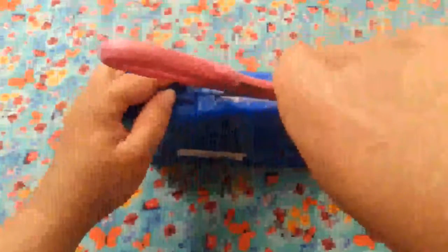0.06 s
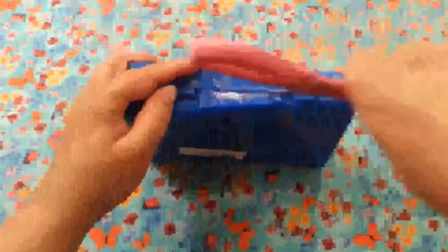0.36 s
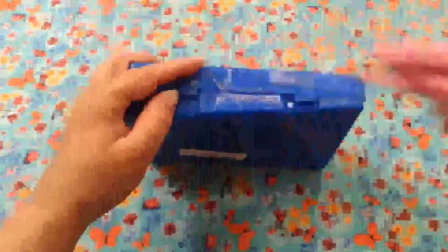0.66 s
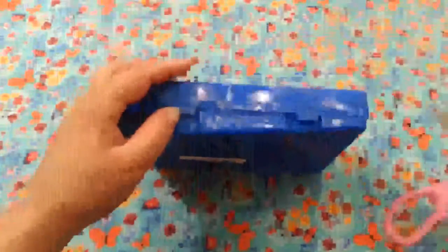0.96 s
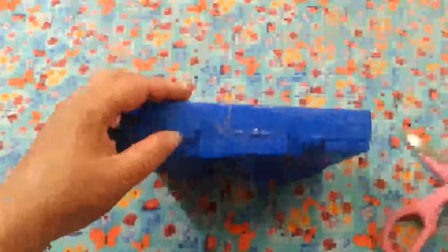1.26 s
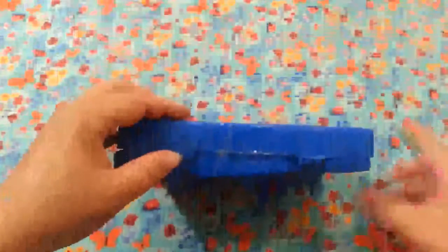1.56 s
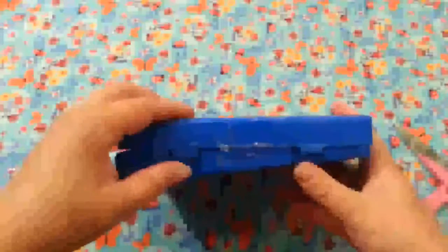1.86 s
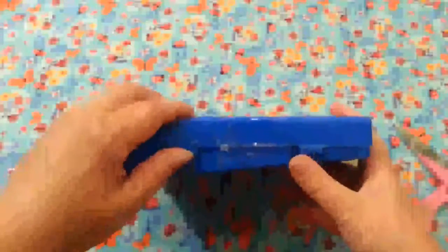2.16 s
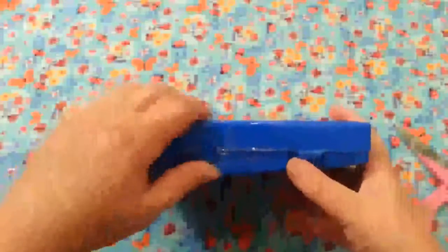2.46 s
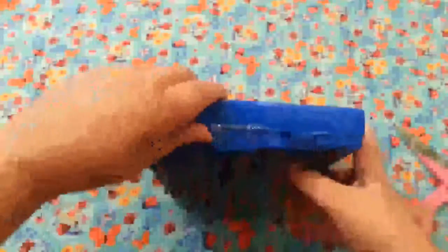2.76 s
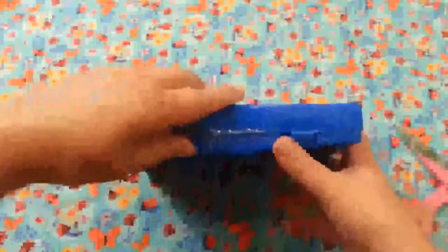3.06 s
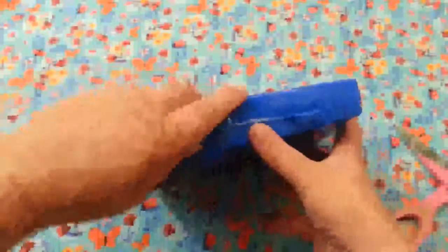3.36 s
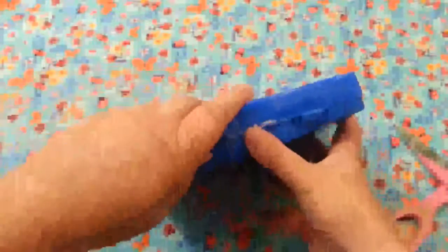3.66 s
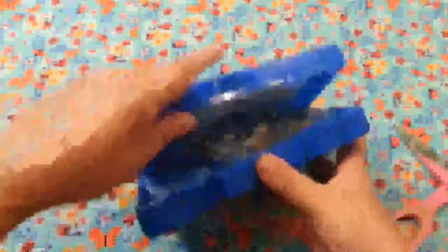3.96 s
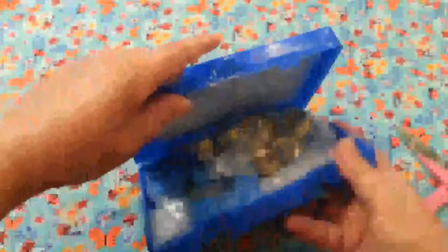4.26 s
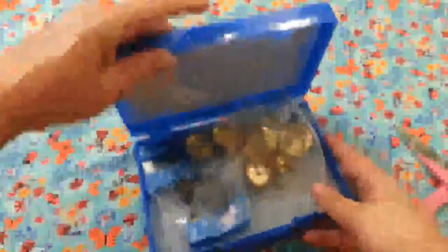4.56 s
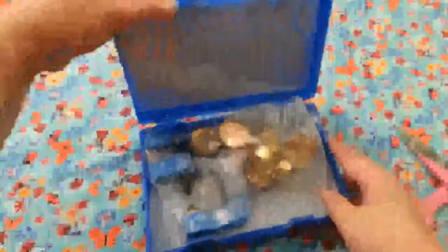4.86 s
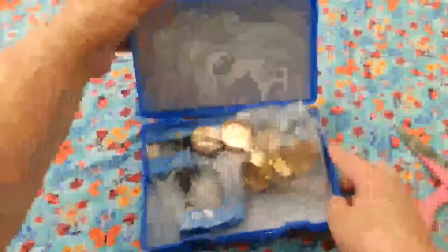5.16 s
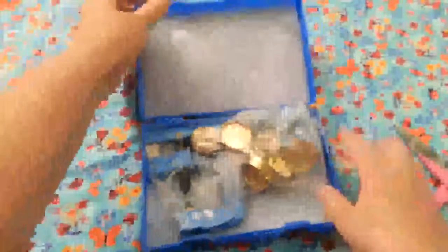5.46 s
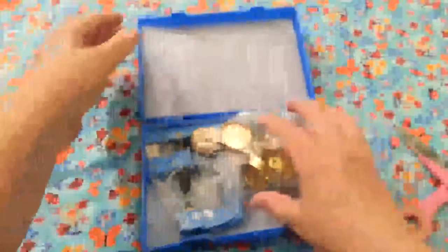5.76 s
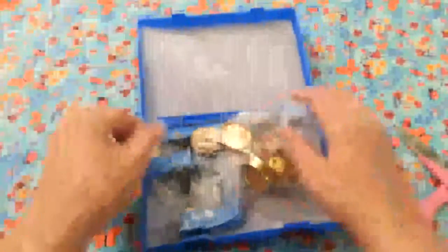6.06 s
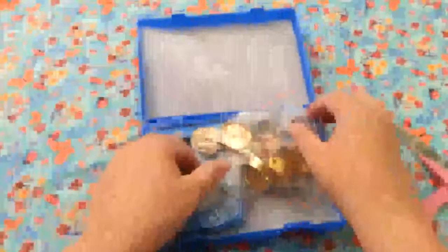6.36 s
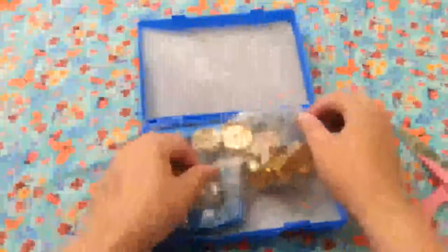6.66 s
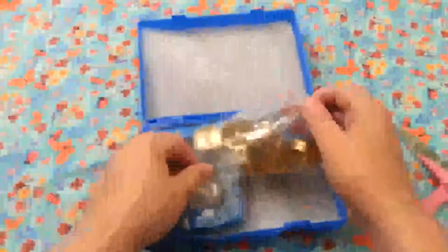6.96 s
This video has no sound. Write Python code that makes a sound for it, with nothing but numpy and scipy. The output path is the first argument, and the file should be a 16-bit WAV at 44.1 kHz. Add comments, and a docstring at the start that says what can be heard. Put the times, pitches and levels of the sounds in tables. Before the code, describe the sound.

Close up in a small, quiet room, a blade rasps on a plastic case and slips off with a knock, and the scissors rattle down on the table. Fingers shift over the case, which ticks, creaks and knocks as it is pried. The latches snap open loudly enough to overload the microphone, with tiny metal clinks. Soft rubbing follows, then a plastic bag crinkles as it is lifted.

```python
"""Scissors scrape through the seal of a plastic case, catching and slipping, then clatter onto the table.
Hands rub, turn and pry the hollow case, which knocks and creaks until its latches snap open,
loud enough to overload the microphone. The lid swings back, and fingers lift a crinkling plastic
bag in which metal parts clink. It all happens close to a camera in a small, softly hissing room."""
import sys
import numpy as np
from scipy import signal
from scipy.fft import rfft, irfft
from scipy.io import wavfile
from scipy.ndimage import uniform_filter1d

SR = 44100
rng = np.random.default_rng(int(sys.argv[2]) if len(sys.argv) > 2 else 0)


def waveform_to_disk(signal):
    """Save audio, clipped to [-1, 1], as 16-bit WAV at the path in sys.argv[1]."""
    frames = np.transpose(np.atleast_2d(signal))
    scaled = np.clip(frames, -1, 1) * 32767
    samples = np.round(scaled).astype(np.int16)
    wavfile.write(sys.argv[1], SR, samples)


N = 318402


def amp(db):
    """Turns decibels into a gain to multiply by."""
    return 10 ** (np.asarray(db) / 20)


def unit(x):
    """Scales a signal to an average (rms) level of 1."""
    return x / np.sqrt(np.mean(x ** 2) + 1e-20)


def read(points, hz):
    """Reads between the rows of a (Hz, value) table, with frequency on a log scale."""
    table_hz, value = np.transpose(points)
    return np.interp(np.log(hz + 1), np.log(table_hz + 1), value)


def add(mix, start_s, sound):
    """Mixes a sound in at the given time."""
    part = mix[:, max(0, round(start_s * SR)):][:, :sound.shape[-1]]
    part += sound[..., :part.shape[1]]


def band(x, hz, kind, order=4):
    """Keeps the lows, the highs or a band between."""
    return signal.sosfilt(signal.butter(order, hz, kind, fs=SR, output="sos"), x)


def colour(x, points, size=2048):
    """Shapes the tone to a (Hz, dB) curve without smearing any sound earlier in time."""
    hz = abs(np.fft.fftfreq(size, 1 / SR))
    log_gain = np.log(amp(np.maximum(read(points, hz), -100)))
    taps = np.fft.ifft(np.exp(signal.hilbert(log_gain).conj())).real[:size // 2]
    return signal.oaconvolve(x, taps[None], axes=1)[:, :x.shape[1]]


def resonances(x, modes):
    """The ringing a sound stirs up. Each mode: pitch in Hz, width in Hz, level in dB."""
    return sum(amp(db) * signal.lfilter(*signal.iirpeak(hz, hz / width, SR), x)
               for hz, width, db in modes)


def pair(x):
    """Blends two unrelated signals into left and right, more alike in the lows than the highs."""
    # Each row: frequency in Hz, how alike the two sides are (1 is identical).
    likeness = [(100, 0.5), (450, 0.52), (1500, 0.58), (4000, -0.06), (10000, 0)]
    # Each row: frequency in Hz, left minus right in dB.
    balance = [(100, 1), (400, -0.8), (1200, -2), (2500, -2), (5000, 0.5), (11000, 2.5)]
    hz, (a, b) = np.fft.rfftfreq(x.shape[1], 1 / SR), rfft(x)
    same = np.clip(read(likeness, hz), 0, 1)
    mid, side = a * np.sqrt((1 + same) / 2), b * np.sqrt((1 - same) / 2)
    lean = amp(read(balance, hz) / 2)
    return irfft([(mid + side) * lean, (mid - side) / lean], x.shape[1])


def wander(rate_hz, shape=N):
    """A smooth random wobble; a higher rate moves faster."""
    return unit(band(rng.standard_normal(shape), rate_hz, "lowpass", order=2))


def fits(rate_hz, depth_db):
    """A gain that comes and goes at random."""
    return amp(depth_db * np.clip(wander(rate_hz), -2, 1.5))


def held(start, end, attack_s, release_s):
    """A gain that rises, holds until the end, then dies away."""
    t = np.arange(N) / SR
    return np.clip((t - start) / attack_s, 0, 1) * np.exp(-np.maximum(t - end, 0) / release_s)


def moves(rows):
    """Each hand move speeds up and slows down. Returns gains for its main sound and its hiss."""
    body, hiss, t = 0, 0, np.arange(N) / SR
    for middle, half, body_db, hiss_db in rows:
        speed = np.exp(-((t - middle) / half) ** 2)
        body += amp(body_db) * speed
        hiss += amp(hiss_db) * speed
    return body, hiss


def burst(decay_s, size=8192, span=90):
    """Countless high rings die together as a puff of noise. A smaller span gives a more even tone."""
    fade = np.exp(-np.arange(size) / SR / max(decay_s, 1e-4))
    spectrum = rfft(rng.standard_normal((2, size)) * fade)
    spectrum /= np.sqrt(uniform_filter1d(abs(spectrum) ** 2, span, axis=1))
    return pair(irfft(spectrum) * np.hanning(2 * size)[size:])


def grains(per_s, spread_db, wash, clump_db):
    """Tiny slips of very unequal size, in clumps, over a wash of still smaller ones."""
    sizes = amp(spread_db * np.minimum(rng.exponential(1, N), 4))
    sizes *= rng.random(N) < per_s / SR
    clumps = amp(clump_db * wander(45))
    slips = unit(sizes * rng.choice([-1, 1], (2, N)))
    return clumps * pair(slips + wash * rng.standard_normal((2, N)))


def struck_spot(x, uneven_db):
    """Every spot on an object favours its own random set of high pitches."""
    modes_hz = np.arange(1000, 14000, 290)
    modes_db = uneven_db * np.clip(rng.standard_normal(len(modes_hz)), -2, 1)
    return colour(x, [(800, 0.0038), *zip(modes_hz, modes_db)])


def crack(db, decay_s, high_db, top_db, low_db, bass_db, uneven_db, span=90):
    """The noise of two things meeting, with four tone controls from bass to top."""
    tone = [(40, -25.5), (220, bass_db), (750, low_db), (1600, -3.5), (4000, high_db),
            (9500, top_db), (14000, top_db - 5)]
    return struck_spot(amp(db) * colour(burst(decay_s, span=span), tone), uneven_db)


def panel(hz, db, damping, swell_cycles=1.491, size=8192):
    """A struck panel swings widest after swell_cycles, then dies within a few more."""
    t, swell_s = np.arange(size) / SR, swell_cycles / hz
    envelope = (t / swell_s * np.exp(1 - t / swell_s)) ** damping
    return amp(db) * envelope * np.sin(2 * np.pi * hz * (t - swell_s))


def scrape(slips_per_s=140, jitter=0.5, spread_db=4):
    """The blade catches and slips unevenly over finer grit; each edge of the seal rasps in fits."""
    # Each row is one drag of the blade: start in seconds, end in seconds, level in dB.
    drags = [(0, 0.011, -30), (0.165, 0.234, -52.5), (0.302, 0.521, -25.5)]
    # Each row is a ring of the seal's edges: pitch in Hz, width in Hz, level in dB.
    edge_modes = [(1080, 260, -5), (1665, 250, -1), (2250, 320, -9.5), (4030, 460, -15.5)]
    # Each row: frequency in Hz, level in dB.
    scrape_tone = [(59, -55), (100, -15), (232, -9.5), (268, -12), (421, 2), (700, -12), (1660, -12),
                   (2360, -12.5), (2840, -12), (4700, -15), (6060, -23), (6720, -21), (8420, -20.5),
                   (11200, -22.5), (13500, -33)]
    rate = slips_per_s * np.exp(jitter * wander(70))
    slips = np.diff(np.floor(np.cumsum(rate) / SR), prepend=0)  # one spike for each slip
    slips *= amp(spread_db * np.clip(rng.standard_normal(N), -2, 1))
    chatter = signal.oaconvolve(slips[None], burst(0.0032, span=40), axes=1)[:, :N]
    grit = struck_spot(unit(chatter) + 0.6 * grains(1500, 2.4, 0.5, clump_db=1.5), uneven_db=2)
    rasp = sum(resonances(grit * fits(35, depth_db=4), [edge]) for edge in edge_modes)
    pressure = fits(25, depth_db=1.2)
    drag = sum(amp(db) * held(start, end, attack_s=0.0009, release_s=0.0052) for start, end, db in drags)
    return drag * unit(pressure * colour(grit + rasp, scrape_tone))


def knocks():
    """Blade, catch and lid hit the hollow case. Returns the panel's swings and the ringing cracks."""
    # Each row: start in seconds, panel pitch in Hz, panel level in dB, crack level in dB,
    # crack decay in seconds, the crack's lows in dB, its top in dB.
    blows = [(0.294, 390, -22, -2, 0.002, 3.5, -8.5), (0.3066, 410, -11, 22.5, 0.0016, -13, -19.5),
             (0.3097, 446, -16, 19, 0.0018, -10, -12.5), (0.5213, 428, -12, 9, 0.0045, -24, -21.5),
             (0.5254, 390, -3, 22.5, 0.0033, -6, -31.5), (2.835, 374, -7, 14.5, 0.0031, 2.5, -16.5),
             (3.969, 452, -31.5, -6.5, 0.0026, -4.5, -23), (3.974, 445, -28, 9, 0.006, -1, -24),
             (4.7065, 368, -22, -2.5, 0.017, 4, -24), (4.8068, 317, -30, 3, 0.0054, -13, -16.5)]
    # Each row is a ring of the hollow case: pitch in Hz, width in Hz, level in dB.
    shell_modes = [(1046, 220, -4), (1360, 110, -6), (1678, 200, 0), (2384, 790, -6.5), (2780, 45, -6),
                   (4040, 230, -7)]
    swings, cracks = np.zeros((2, 2, N))
    for start, hz, panel_db, crack_db, decay_s, low_db, top_db in blows:
        add(swings, start, panel(hz, panel_db, damping=4.6))
        add(cracks, start, crack(crack_db, decay_s, high_db=-14.5, top_db=top_db, low_db=low_db,
                                 bass_db=-9.5, uneven_db=3.5))
    return swings, cracks + resonances(cracks, shell_modes)


def table_boom(start=0.525, hz=120, db=-39, fade_s=1.19):
    """The blade slips off the case and the table hums on, falling 60 dB in fade_s."""
    out, t = np.zeros((2, N)), np.arange(SR) / SR
    add(out, start, amp(db - 60 * t / fade_s) * np.sin(2 * np.pi * hz * t))
    return out


def ticks(decay_s=0.0026):
    """Plastic edges catch on each other and click without moving a panel."""
    # Each row: start in seconds, level in dB, the click's top in dB.
    clicks = [(0.6829, 13, -17.5), (0.6841, 15, -32), (2.505, 3, -10.5), (2.63, 1, -25), (3.4401, -1, -36),
              (4.0171, 8, -23), (4.918, -7, -37), (4.9774, -6, -8), (5.001, -2, -27), (5.409, -9, -28)]
    out = np.zeros((2, N))
    for start, db, top_db in clicks:
        add(out, start, crack(db, decay_s, high_db=-14.5, top_db=top_db, low_db=-5, bass_db=-8,
                              uneven_db=0.5, span=30))
    return out


def rubbing(grip_db=-58.5):
    """Hands slide and shift on the case, whose shell colours the tiny slips; dry skin adds a hiss."""
    # Each row: middle of a stroke in seconds, half its length in seconds, rub in dB, hiss in dB.
    strokes = [(2.252, 0.025, -46.5, -85), (2.65, 0.038, -54, -74), (2.817, 0.031, -48, -71),
               (3.422, 0.1, -52, -47.5), (3.813, 0.032, -44, -68), (4.025, 0.054, -43, -48),
               (4.71, 0.085, -49.5, -42), (4.968, 0.084, -81, -49.5), (5.401, 0.03, -72, -49.5),
               (5.881, 0.069, -58.5, -54)]
    # The tones of the rubbed case and of skin. Each row: frequency in Hz, level in dB.
    shell_tone = [(88, -52.5), (150, -14), (411, -4), (761, -12.5), (935, -4.5), (1070, -9), (2250, -12),
                  (2810, -15.5), (6760, -29.5), (13000, -33.5)]
    skin_tone = [(300, -27.5), (1500, 0), (3000, 5.5), (5000, 1.5), (7000, -11.5), (13000, -11)]
    grip = amp(grip_db) * held(start=1.067, end=5.27, attack_s=0.041, release_s=0.041)
    rub, hiss = moves(strokes)
    shell = unit(colour(grains(900, 2.1, 0.23, clump_db=2), shell_tone))
    skin = unit(colour(grains(1500, 2.5, 0.66, clump_db=5), skin_tone))
    return (grip + rub) * shell + hiss * skin


def squeaks(waver=0.04, roughness=0.55, overtone_db=-13):
    """Fingertips stick and slip on plastic, making a tone of unsteady pitch and strength."""
    # Each row: start in seconds, length in seconds, pitch in Hz, level in dB.
    slides = [(1.082, 0.04, 2830, -56.5), (3.171, 0.075, 390.5, -45), (3.392, 0.086, 959, -47.5),
              (3.428, 0.025, 2850, -52), (4.029, 0.02, 2590, -41), (4.932, 0.075, 1119, -52.5),
              (5.514, 0.044, 525, -58), (5.805, 0.029, 2790, -55.5), (5.812, 0.068, 903, -50.5),
              (6.238, 0.037, 1004, -59.5)]
    out = np.zeros((2, N))
    for start, length, hz, db in slides:
        n = int(length * SR)
        drift, flutter = wander(160, (2, n))
        phase = 2 * np.pi * np.cumsum(hz * (1 + waver * drift)) / SR
        tone = np.sin(phase) + amp(overtone_db) * np.sin(3 * phase)
        envelope = np.hanning(n) ** 0.5 * (1 + roughness * flutter)
        add(out, start, amp(db) * unit(envelope * tone))
    return out


def scissors_drop(ring_width_hz=260, touch_hz=500, drop_hz=380, clatter_db=-10):
    """The scissors tap the table, then drop and rattle to rest. Returns table thuds and metal rings."""
    # Each row is a tap that rings one spot of the blades: start in seconds, thud in dB,
    # blade noise in dB, decay in seconds, ring pitch in Hz, ring level in dB.
    touches = [(1.2313, -22.5, -1, 0.0038, 3510, 10), (1.2679, -29, -12, .002, 3540, 11),
               (1.3616, -53, -3.5, 0.0093, 3700, 3), (1.3876, -46, -7.5, 0.0084, 7100, 5)]
    # Each row: start in seconds, thud in dB, blade noise in dB, decay in seconds.
    bounces = [(1.525, -34, 8.5, 0.0055), (1.5301, -21, 16.5, 0.0073), (1.5346, -34, 12.5, 0.011),
               (1.5455, -26, 13, 0.015), (1.5632, -28, 10.5, 0.015), (1.583, -32, 7.5, 0.07)]
    # Each row is a ring of the scissors lying flat: pitch in Hz, width in Hz, level in dB.
    blade_modes = [(1510, 560, -4), (3180, 87, 2), (3900, 260, 5), (5040, 140, 7.5), (5680, 120, 1.5),
                   (6470, 120, 6), (7500, 160, 4), (8100, 320, 7), (9600, 200, 9), (12100, 260, 8.5)]
    table, metal = np.zeros((2, 2, N))
    for start, thud_db, blade_db, decay_s, ring_hz, ring_db in touches:
        tick = crack(blade_db, decay_s, high_db=0, top_db=0.5, low_db=-4, bass_db=7.5,
                     uneven_db=2.5, span=40)
        add(table, start, panel(touch_hz, thud_db, damping=13.6))
        add(metal, start, tick + resonances(tick, [(ring_hz, ring_width_hz, ring_db)]))
    for start, thud_db, blade_db, decay_s in bounces:
        clatter = crack(blade_db, decay_s, high_db=-10, top_db=-13.5, low_db=-3.5, bass_db=12.5,
                        uneven_db=6)
        add(table, start, panel(drop_hz, thud_db, damping=2.8))
        add(metal, start, amp(clatter_db) * clatter + resonances(clatter, blade_modes))
    return table, metal


def bumps(pat_db=28, decay_s=0.0083):
    """A soft fingertip swings a panel of the case, with a dull pat that grows with its force."""
    # Each row: start in seconds, panel pitch in Hz, panel level in dB.
    landings = [(1.875, 418, -41.5), (2.039, 473, -39), (2.6317, 448, -33.5), (2.671, 406, -37),
                (3.186, 400, -39.5), (3.204, 360, -33), (3.474, 300, -40), (4.14, 210, -35),
                (4.436, 292, -30.5), (4.723, 380, -33.5), (4.797, 330, -35)]
    out = np.zeros((2, N))
    for start, hz, db in landings:
        pat = crack(db + pat_db, decay_s, high_db=-18, top_db=-32.5, low_db=1.5, bass_db=-3.5,
                    uneven_db=7.5)
        add(out, start, panel(hz, db, damping=3.55) + pat)
    return out


def creaks(decay_s=0.0009):
    """The pried lid slips against the tray in short runs; each slip jolts a panel and rings the rim."""
    # Each row: start in seconds, panel pitch in Hz, panel level in dB, rim level in dB.
    slips = [(2.226, 405, -30, -7), (2.2337, 433, -27.5, 3), (2.2427, 450, -31.5, 0.5),
             (2.2492, 444, -24.5, 3), (2.258, 470, -33, -2), (3.8159, 540, -28.5, -1.5),
             (3.8232, 480, -29, -11), (3.84, 520, -40, -5.5)]
    # Each row is a ring of the rim: pitch in Hz, width in Hz, level in dB.
    rim_modes = [(1076, 150, 1.5), (1440, 230, -5), (2300, 260, -8), (4050, 300, -14.5)]
    slip_tone = [(100, -10), (800, 6), (2600, 1.5), (3300, -9), (12000, -12)]
    out = np.zeros((2, N))
    for start, hz, panel_db, rim_db in slips:
        slip = amp(rim_db) * colour(burst(decay_s, span=24), slip_tone)
        add(out, start, panel(hz, panel_db, damping=3.4) + resonances(slip, rim_modes))
    return out


def focus_motor(start=2.519, count=9, steps_per_s=30, db=-10.5, accent_db=5):
    """Faint, even ticks like the steps of a camera's focus motor; every fourth is harder."""
    tick_tone = [(60, -42), (500, 3), (2400, -20), (3400, 4.5), (4600, -12), (12000, -42)]
    out = np.zeros((2, N))
    for step in range(count):
        accented = step % 4 == 0
        tick = colour(burst(0.0007), tick_tone)
        add(out, start + step / steps_per_s, amp(db + accent_db * accented) * tick)
    return out


def clinks():
    """Small metal parts touch, and each rings with one high, fading tone."""
    # Each row: start in seconds, pitch in Hz, level in dB, seconds to fade by 60 dB.
    rings = [(4.0175, 8380, -33, 0.36), (4.091, 10490, -37.5, 0.19), (4.119, 10540, -38, 0.35),
             (4.725, 8500, -52, 0.3), (7.21, 8600, -39, .25)]
    out, t = np.zeros((2, N)), np.arange(SR // 2) / SR
    for start, hz, db, fade_s in rings:
        add(out, start, amp(db - 60 * t / fade_s) * np.sin(2 * np.pi * hz * t))
    return out


def snaps(crack_cycles=1.65, lowest_hz=610, highest_hz=11800):
    """Stiff latches let go and ring the lid, with little bass. Returns each snap with its echo in dB."""
    # Each row: start in seconds, lid pitch in Hz, then in dB: lid level, crack level,
    # the crack's highs, the latch's ring, the share sent to the echo.
    releases = [(4.1195, 2270, -4.5, 17, -0.5, 5.5, -3.5), (4.192, 1085, 7.5, 31.5, -8.5, -9, 2),
                (4.4059, 871, 5.5, 33, -11.5, 1, 1.5)]
    # Each row is a broad ring of a latch: pitch in Hz, width in Hz, level in dB.
    latch_modes = [(2000, 560, -2), (2660, 470, 2), (4000, 400, -1.5), (4950, 280, -10.5)]
    sources = []
    for start, hz, lid_db, crack_db, high_db, latch_db, echo_db in releases:
        out = np.zeros((2, N))
        noise = crack(crack_db, crack_cycles / hz, high_db, top_db=-18, low_db=-6, bass_db=-17.5,
                      uneven_db=2.5, span=24)
        snap = panel(hz, lid_db, damping=2.7) + noise + amp(latch_db) * resonances(noise, latch_modes)
        snap = band(snap, lowest_hz, "highpass", order=3)
        add(out, start, band(snap, highest_hz, "lowpass", order=6))
        sources.append((out, echo_db))
    return sources


def bag(patch_sizes=10, pops_per_s=160, flurry_db=0.5, ring_width_hz=330, ring_db=5):
    """Patches of thin plastic buckle in tiny pops, each size at its own pitch, among sharp creases."""
    # Each row: middle of a pull in seconds, half its length in seconds, crumple in dB, fizz in dB.
    pulls = [(6.372, 0.028, -49, -54.5), (6.46, 0.057, -42.5, -56), (6.567, 0.039, -38.5, -50),
             (6.635, 0.032, -42, -57), (6.745, 0.08, -40.5, -45), (6.885, 0.072, -44, -49.5),
             (7.03, 0.049, -43, -46.5), (7.128, 0.035, -38.5, -45.5), (7.205, 0.049, -42.5, -46)]
    # Each row: start in seconds, level in dB, ring pitch in Hz, treble in dB.
    creases = [(6.318, -5.5, 3450, -26), (6.351, -10, 1480, -24), (6.386, -15, 2400, -17),
               (6.4034, 1.5, 1820, -22), (6.453, -3, 2580, -28), (6.525, 1, 1900, -15),
               (6.549, -3, 1300, -26), (6.58, -2, 2400, -20), (6.597, 3.5, 2000, -17),
               (6.6173, -2, 1450, -25), (6.6856, -3, 2400, -14), (6.7055, 0, 1770, -18),
               (6.769, -7, 420, -26), (6.778, -3.5, 3480, -8), (6.8546, -6, 1150, -17),
               (6.968, -0.5, 1300, -28), (7.0381, 5, 2100, -15), (7.043, 1, 3030, -19),
               (7.11, 3.5, 1800, -30), (7.157, 1, 1650, -22), (7.1694, 4.5, 2200, -19)]
    # Each row: frequency in Hz, level in dB.
    bag_tone = [(120, -50), (200, -28), (239, -5), (377, -2), (675, -2.5), (750, -7.5), (977, 3.5),
                (1630, 3.5), (3600, -4), (3930, -2.5), (6330, -20), (11900, -21.5), (13500, -34)]
    crinkle = grains(700, 2, 0.25, clump_db=2.2)
    edges_hz = np.geomspace(700, 13500, patch_sizes + 1)
    for patch_hz in zip(edges_hz, edges_hz[1:]):
        pops = rng.standard_normal((2, N)) * (rng.random(N) < pops_per_s / SR)
        flurries = amp(flurry_db * np.clip(wander(18), -2, 2))
        crinkle += amp(-6) * band(unit(pops * flurries), patch_hz, "bandpass", order=2)
    crinkle = colour(crinkle, bag_tone)
    crumple, fizz = moves(pulls)
    out = amp(0.9) * crumple * unit(band(crinkle, 4070, "lowpass"))
    out += amp(2) * fizz * unit(band(crinkle, 5600, "highpass"))
    for start, db, hz, treble_db in creases:
        tone = [(60, -50), (400, -14.5), (1500, -9.5), (3500, -10),
                (7000, treble_db), (13000, treble_db - 3)]
        crease = amp(db) * colour(burst(0.001), tone)
        add(out, start, crease + resonances(crease, [(hz, ring_width_hz, ring_db)]))
    return out


def room_echo(x, onset_s=0.0009, build_s=0.0049, reflections_per_s=4500, size=256):
    """Sound bounces off table and lid, then the walls; each frequency dies at its own speed."""
    # Each row: frequency in Hz, seconds to fade by 60 dB.
    fade_times = [(100, 0.4), (260, 0.54), (420, 0.46), (700, .54), (1800, 0.56), (4800, 0.63),
                  (12000, 0.44)]
    # Each row: frequency in Hz, level in dB.
    echo_tone = [(100, -8.5), (170, -3), (260, -4), (350, -7.5), (470, -2.5), (650, -3), (1000, -5),
                 (2000, -3), (4000, -2.5), (10000, -3)]
    taps = rng.standard_normal((2, SR)) * (rng.random((2, SR)) < reflections_per_s / SR)
    taps /= np.linalg.norm(taps, axis=1, keepdims=True)
    hz, t, bands = signal.stft(taps, SR, nperseg=size)
    same = 1 / np.sqrt(1 + (hz[:, None] / 950) ** 4)  # long waves reach both microphones alike
    bands[1] = same * bands[0] + np.sqrt(1 - same ** 2) * bands[1]
    fade_s = read(fade_times, hz)[:, None]
    equal_energy = np.sqrt(2 * np.log(1000) / fade_s)
    bands *= amp(-60 * t / fade_s) * equal_energy
    tail = signal.istft(bands, SR, nperseg=size)[1]
    tail *= np.clip((np.arange(tail.shape[1]) / SR - onset_s) / build_s, 0, 1)
    return signal.fftconvolve(x, colour(tail, echo_tone), axes=1)[:, :N]


def room_hush(db=-54.5):
    """The soft, steady noise of the still room."""
    # Each row: frequency in Hz, level in dB.
    hush_tone = [(25, -20), (50, -17.5), (100, -2.5), (200, -0.5), (550, -6.5), (1000, -8), (1700, -13),
                 (3400, -8.5), (6100, -20), (9000, -16.5), (13000, -19)]
    return amp(db) * unit(colour(pair(rng.standard_normal((2, N))), hush_tone, size=8192))


def scene():
    """Adds up the close sounds, their echo, the table's hum and the room's hush."""
    table, blades = scissors_drop()
    blades *= amp([[1.5], [-1.5]])  # a little to the left
    swings, cracks = knocks()
    # Each entry: a sound, the share of it sent to the echo in dB.
    sources = [(swings, -6),  # a panel's slow swing carries little into the room
               (cracks, -0.7), (bumps() + ticks(), -1), (creaks(), -3), *snaps(),
               (table, 3.5), (blades, -5), (scrape(), -0.8), (rubbing(), 0.5), (bag(), -0.7),
               (focus_motor() + squeaks() + clinks(), -3)]
    near = sum(sound for sound, _ in sources)
    echo = room_echo(sum(amp(echo_db) * sound for sound, echo_db in sources))
    return near + echo + table_boom() + room_hush()


def record(dry, highest_hz=13750):
    """Overload pushes the microphone's signal off centre in a thump and clips it; top treble is cut."""
    overload = np.maximum(abs(dry) - 1, 0).mean(0)
    thump = 0.55 * band(overload, 600, "lowpass", order=1)
    clipped = np.clip(dry + thump, -1, 1)
    treble_cut = signal.firwin(255, highest_hz, window=("kaiser", 8), fs=SR)
    return signal.oaconvolve(clipped, treble_cut[None], "same")


dry = scene()
out = record(dry)
waveform_to_disk(out)
```